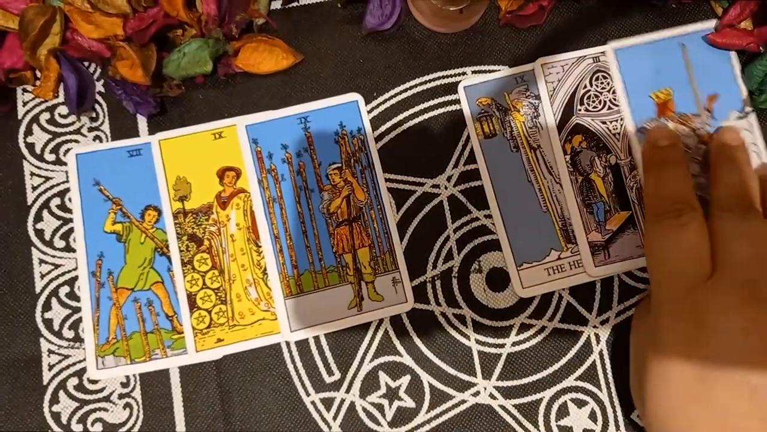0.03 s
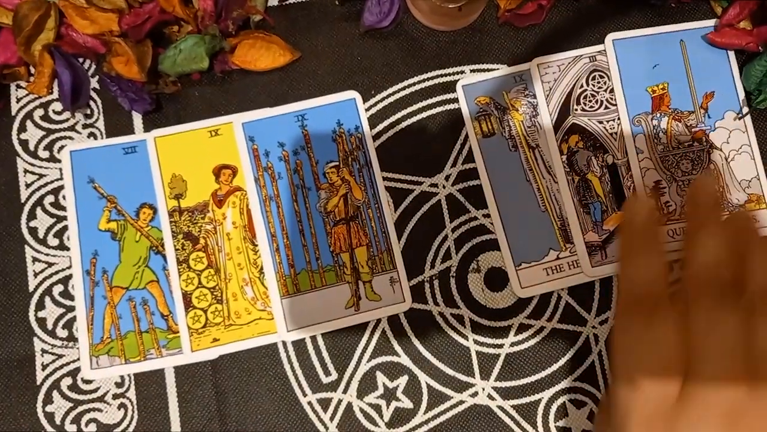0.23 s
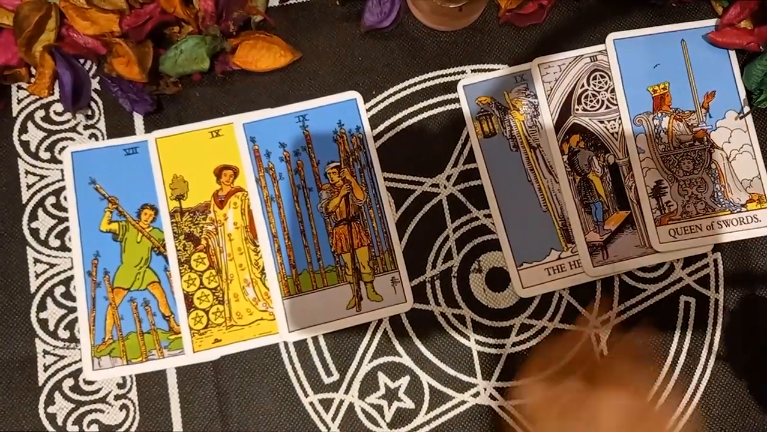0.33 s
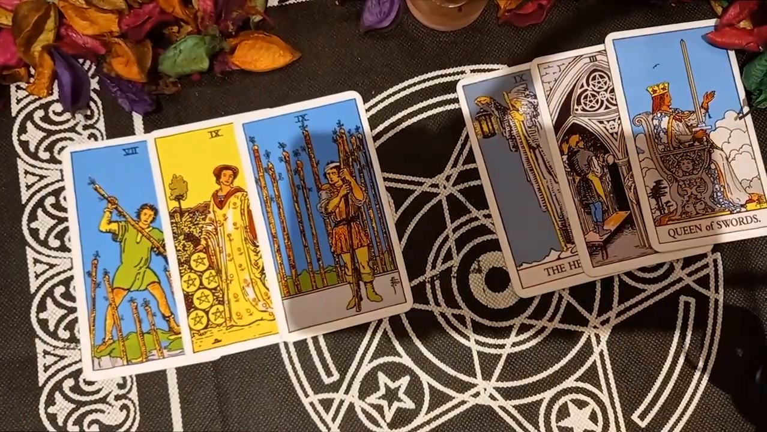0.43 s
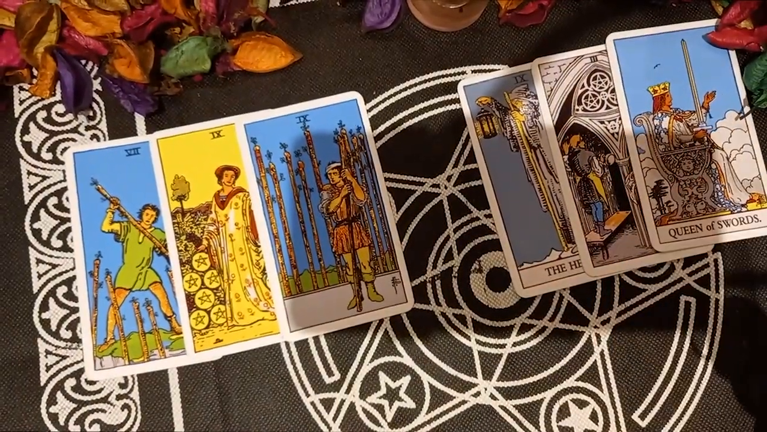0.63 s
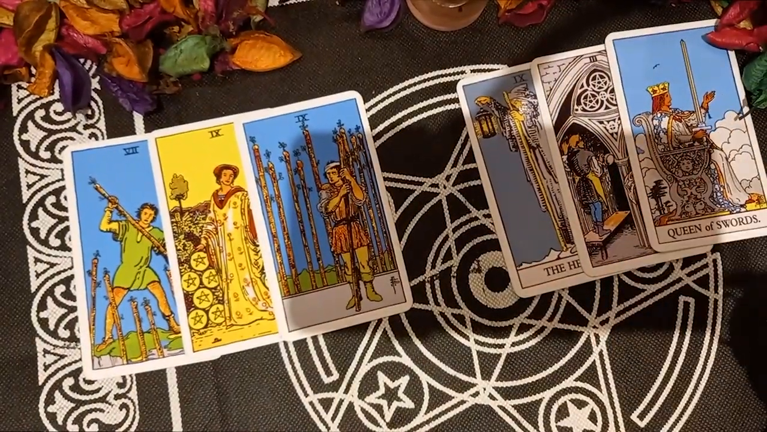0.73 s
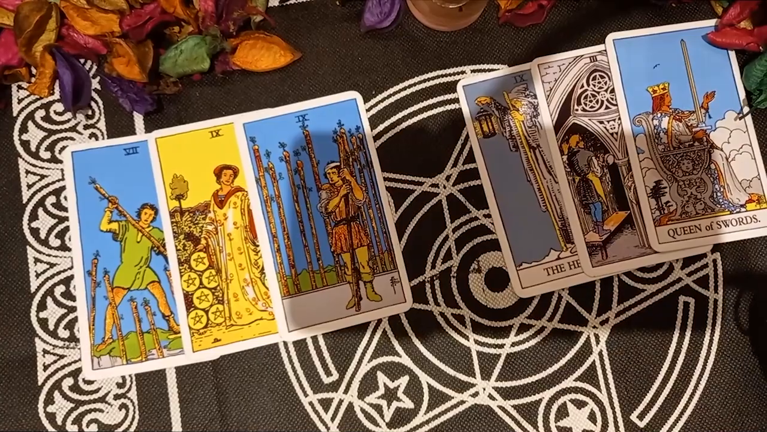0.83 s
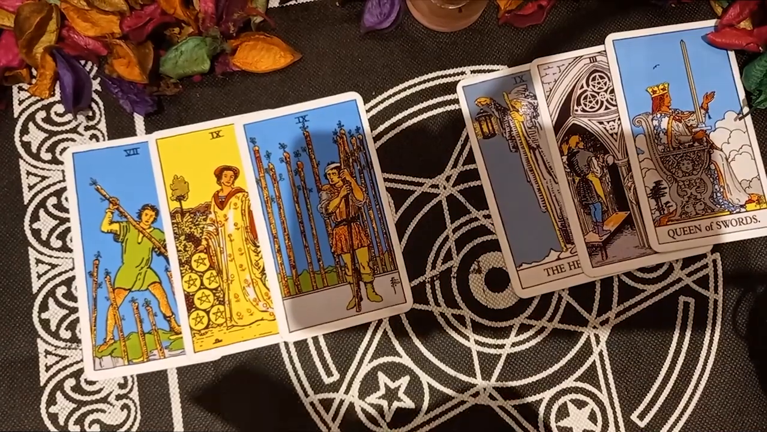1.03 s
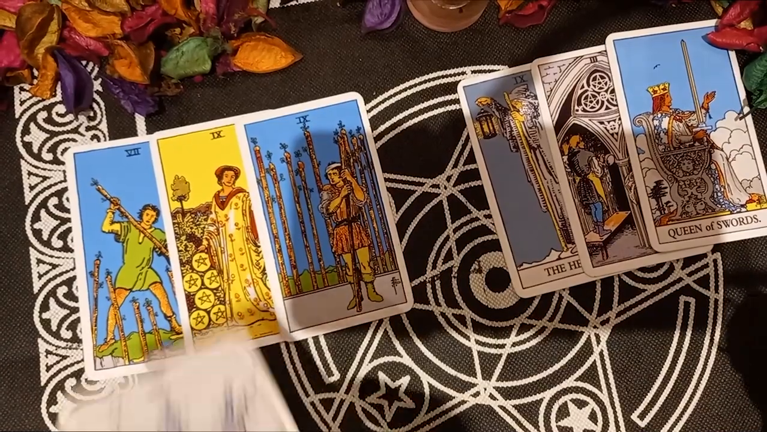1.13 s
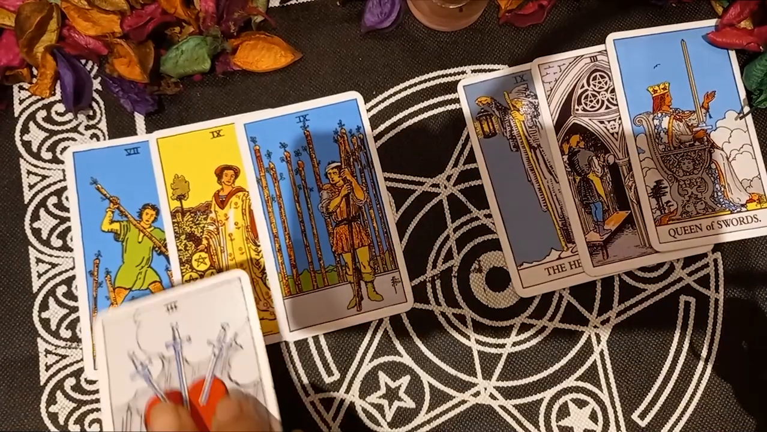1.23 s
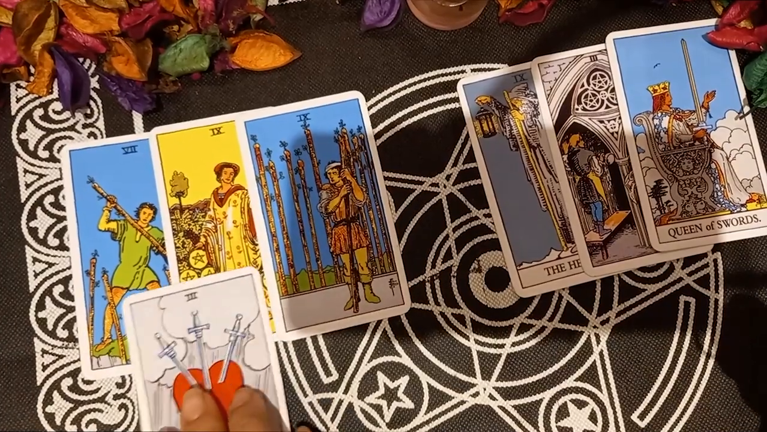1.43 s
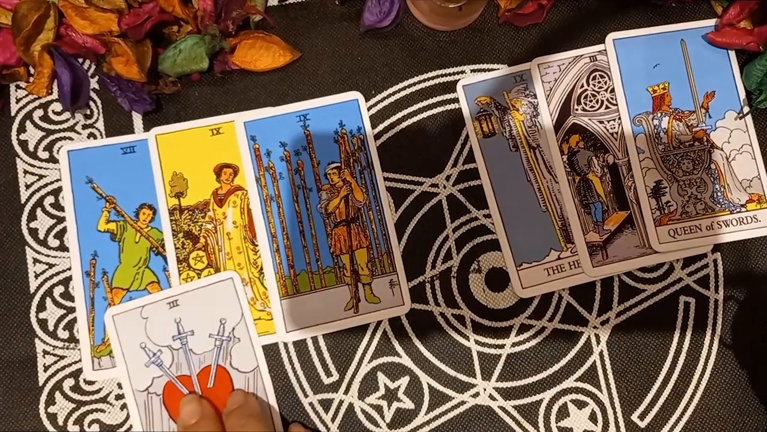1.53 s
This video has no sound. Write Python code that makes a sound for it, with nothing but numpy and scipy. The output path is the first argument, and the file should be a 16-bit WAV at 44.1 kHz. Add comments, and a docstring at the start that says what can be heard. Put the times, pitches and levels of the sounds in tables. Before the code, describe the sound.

A stiff card snaps once as it is drawn off a deck, close up in a small room. At first an arm rustles faintly over a tablecloth. From about 0.7 seconds fingers tick and the card slides with a rising hiss, then snaps sharply at 0.9 seconds with a short room echo. Light ticks follow around 1.1 and 1.4 seconds. Low rumble and faint hiss continue throughout.

```python
"""A stiff card drawn off a deck on a cloth-covered table in a small room, close to the microphone.
An arm rustles over the cloth, fingers brush and tick on the cards, and the edge slides with a rising hiss.
At 0.9 s the card lets go in a quick run of cracks, pushes puffs of air and slaps back on the deck.
The room answers and a few last ticks follow. A low rumble and faint hiss lie under it all."""
import sys
import numpy as np
from scipy import signal
from scipy.fft import rfft, irfft
from scipy.io import wavfile
from scipy.ndimage import uniform_filter1d

SR = 44100
rng = np.random.default_rng(int(sys.argv[2]) if len(sys.argv) > 2 else 0)


def persist_wave(psi):
    """Save psi, clipped to +-1, as 16-bit WAV."""
    counts = np.round(np.clip(psi, -1, 1) * 32767).astype(np.int16)
    wavfile.write(sys.argv[1], SR, np.atleast_2d(counts).T)


N = 70560

# cracks of the card's edge: start_s, level_db, treble_tilt_db_per_octave
EDGE_CRACKS = [(0.8973, -28.5, -11), (0.9026, -20.5, -5.5), (0.9043, -26, -1), (0.9054, -10, 0.5),
               (0.9063, -11, 0), (0.9098, -22.5, 5), (0.9107, -9.5, 1)]
SLAP_S = .9116  # the freed card lands back on the deck


def snap():
    """Each crack is a sharp click and a trace of scraping; the last slap sets card and deck ringing."""
    # colour of a crack: freq_hz, gain_db
    crack_colour = [(100, -29), (400, -17), (750, -4), (1050, 0), (1600, -13), (2100, -3), (2500, 6.5),
                    (2950, 5.5), (3400, -3.5), (3900, -3), (4400, -5), (5700, 0.5), (8000, -7.5),
                    (9800, -1.5), (12000, -17.5), (16000, -13.5)]
    # modes of card and deck: pitch_hz, level_db, t60_s
    card_modes = [(166, -40.5, .09), (387, -33, 0.045), (625, -36, 0.057), (773, -42.5, 0.086),
                  (1042, -35, 0.063), (1764, -51.5, 0.068), (2070, -49.5, 0.073), (2412, -44.5, 0.12),
                  (2574, -47, .06), (2690, -43, 0.062), (2927, -42.5, 0.086), (3200, -49, 0.045)]
    out, t = np.zeros(N), np.arange(SR // 4) / SR
    for start_s, level_db, tilt_db in EDGE_CRACKS:
        crack = -amp(level_db) * bent(click(crack_colour, tilt_db))
        fibre_scrape = amp(-6) * signal.fftconvolve(crack, burst(decay_s=.0008))
        add(out, start_s, crack)
        add(out, start_s, fibre_scrape)
    add(out, SLAP_S, ringing(card_modes, t))
    return out


def bent(x):
    """A stiff sheet carries high notes faster than low ones, smearing a click into a tiny chirp."""
    delay_s = 0.000677  # bending waves reach the card's edge this late at 1 kHz
    hz = np.fft.rfftfreq(2 * len(x), 1 / SR)
    phase_lag = 4 * np.pi * delay_s * np.sqrt(1000 * hz)
    return irfft(rfft(x, 2 * len(x)) * np.exp(-1j * phase_lag))


def puffs():
    """The flapping card pushes air: a short pressure peak inside a wider suction."""
    # puffs of air: peak_s, peak_db, half_width_s, suction_ratio
    air_puffs = [(0.9007, -40, .0006, .5), (0.9070, -23, 0.00042, 0.75), (0.9120, -25, 0.00039, 0.58)]
    spread = 2.9  # the suction lasts this many times as long as the push
    out = np.zeros(N)
    for peak_s, peak_db, half_width_s, suction in air_puffs:
        u = (np.arange(N) / SR - peak_s) / half_width_s
        push = (1 + suction) * np.exp(-u ** 2)
        pull = suction * np.exp(-(u / spread) ** 2)
        out += amp(peak_db) * (push - pull)
    return out


def sliding():
    """Card rubs on card: a light touch only fizzes, pressure makes the whole sheet sound."""
    # strokes of skin and card over card: peak_s, level_db, rise_s, fall_s, body_trim_db
    strokes = [(0.137, -64.5, .025, 0.013, 1), (0.748, -59.5, 0.0047, 0.0044, -5),
               (0.762, -66.5, 0.0039, 0.0062, 9.5), (0.810, -64, 0.039, 0.025, -7),
               (0.842, -59, 0.011, 0.0054, -4), (0.88, -52.5, 0.024, 0.034, 2),
               (1.095, -67, 0.024, 0.05, -1.5), (1.190, -69.5, 0.042, 0.043, -7)]
    # fizz of a light touch: freq_hz, gain_db
    fizz_colour = [(200, -27), (3000, -30), (4500, -16.5), (6500, 0.5), (9500, 1), (11000, -2.5),
                   (12500, -7), (16000, -11)]
    # body added by pressure: freq_hz, gain_db
    body_colour = [(200, -10), (800, -0.5), (1300, -7.5), (1800, -7.5), (2800, 0), (3800, -8), (5000, -16),
                   (16000, -30)]
    body_db = -10  # against the fizz, before each stroke's trim
    fizz_level = swells([row[:4] for row in strokes])
    body_level = swells([(s, db + body_db + trim, rise, fall) for s, db, rise, fall, trim in strokes])
    fizz = fizz_level * evened(coloured(friction(), fizz_colour))
    body = body_level * evened(coloured(friction(), body_colour))
    return fizz + body


def friction():
    """Fine grains in a smooth hiss, uneven as the card sticks and slips."""
    grains_per_s, stick_db, stick_s = 2500, 2, .012
    grains = rng.standard_normal(N) * (rng.random(N) < grains_per_s / SR)
    grip = evened(uniform_filter1d(rng.standard_normal(N), size=round(stick_s * SR)))
    return amp(stick_db * grip) * .5 * (evened(grains) + rng.standard_normal(N))


def ticks():
    """Small catches of a card edge: a brief scrape, and perhaps a high ring."""
    # catches of fingers and card edges: start_s, level_db, ring_over_scrape_db, scrape_decay_s
    catches = [(0.6876, -49, 18, 0.0029), (0.74, -51, -9, .005), (0.7599, -50, -6, 0.0017),
               (1.003, -45, -16, 0.0025), (1.0780, -33.5, -21, 0.0039), (1.0872, -32, -6, 0.0038),
               (1.379, -47, -16, .003)]
    # colour of a tick: freq_hz, gain_db
    tick_colour = [(200, -15), (700, -3), (1400, 4), (1900, -11.5), (2700, -9), (4500, -1), (7000, 0.5),
                   (10000, -3.5), (16000, -16)]
    # modes of a card's corner: pitch_hz, relative_db, t60_s
    corner_modes = [(2520, -14, 0.013), (6800, -5, 0.01), (7080, 6, 0.008)]
    ring = ringing(corner_modes, np.arange(SR // 20) / SR)
    out = np.zeros(N)
    for start_s, level_db, ring_db, decay_s in catches:
        add(out, start_s, amp(level_db) * signal.fftconvolve(click(tick_colour), burst(decay_s)))
        add(out, start_s, amp(level_db + ring_db) * ring / np.linalg.norm(ring))
    return out


def cloth():
    """Dull rustle of the arm moving over the tablecloth."""
    # arm movements: peak_s, level_db, rise_s, fall_s
    sweeps = [(0.06, -65.5, 0.12, 0.068), (0.33, -71, 0.15, 0.085), (0.79, -71, 0.066, 0.18),
              (1.10, -60.5, 0.023, 0.028), (1.25, -69, 0.22, 0.29), (1.56, -71.5, 0.19, .1)]
    # colour of the rustle: freq_hz, gain_db
    rustle_colour = [(60, -4), (200, -3.5), (420, -2), (800, 0.5), (1300, -15.5), (2500, -19),
                     (6000, -16.5), (16000, -53)]
    return swells(sweeps) * noise(rustle_colour)


def echoes(x):
    """Table and nearby things throw the sound straight back at the microphone."""
    # near surfaces: delay_s, gain_db
    reflections = [(.0064, -21), (0.012, -20.5)]
    out = np.zeros(N)
    for delay_s, gain_db in reflections:
        add(out, delay_s, amp(gain_db) * x)
    return out


def room(handling):
    """Every crack gets its own tail, the quiet handling shares one; a few low resonances hang on."""
    # resonances that outlast the snap: pitch_hz, level_db, t60_s
    room_modes = [(391, -43.5, 0.32), (415, -47, 0.44), (641, -54, 0.21)]
    delay_s, build_s, snap_send_db = .006, .025, 0.5
    out, t = np.zeros(N), np.arange(SR) / SR
    add(out, delay_s, signal.fftconvolve(handling, room_tail()))
    for start_s, level_db, _ in EDGE_CRACKS:
        add(out, start_s + delay_s, amp(level_db + snap_send_db) * room_tail())
    add(out, SLAP_S + delay_s, ringing(room_modes, t) * (1 - np.exp(-t / build_s)))
    return out


def room_tail(level_db=-8, rise_s=0.0039):
    """One diffuse decay of the room: it builds quickly, and the low mids last longest."""
    # decay of the room: freq_hz, t60_s
    decay_times = [(150, 0.23), (500, 0.86), (1400, 0.35), (3500, 0.35), (9000, 0.39), (16000, 0.3)]
    # colour of the room: freq_hz, gain_db
    room_colour = [(100, 0), (280, 4), (400, 19.5), (520, 2.5), (1000, 7.5), (1600, 0.5), (2600, 3),
                   (4000, -1.5), (6000, -5), (9500, -9), (12000, -17.5), (16000, -16)]
    hz, t, spectra = signal.stft(rng.standard_normal(SR), SR, nperseg=256)
    decay = amp(read(room_colour, hz)[:, None] - 60 * t / read(decay_times, hz)[:, None])
    tail = signal.istft(spectra * decay * (1 - np.exp(-t / rise_s)), SR)[1]
    return amp(level_db) * tail / np.linalg.norm(tail)


def room_tone(rumble_db=-47, hiss_db=-58):
    """The air of the room: a wavering low rumble under steady hiss."""
    # colour of the rumble: freq_hz, gain_db
    rumble_colour = [(15, -58.5), (31, -29), (41, 0.5), (52, -1.5), (65, 0.5), (85, -9.5), (115, -16.5),
                     (150, -29.5), (300, -75)]
    # wavering of the rumble: time_s, relative_db
    rumble_swell = [(0.0, -48), (0.066, -51.5), (0.102, -53), (0.31, -43), (0.552, -54.5), (0.566, -46),
                    (0.77, -46.5), (0.792, -50), (1.114, -41), (1.144, -52.5), (1.212, -41.5),
                    (1.386, -50.5), (1.568, -49), (1.6, -55)]
    # colour of the hiss: freq_hz, gain_db
    hiss_colour = [(40, -8), (110, 0.5), (180, 4.5), (260, -4), (400, -8), (700, -21.5), (1200, -32),
                   (3000, -39.5), (4500, -37), (6500, -29), (10500, -30.5), (12500, -37.5), (16000, -40)]
    low = noise(rumble_colour)
    low /= np.sqrt(uniform_filter1d(low ** 2, size=3000) + 1e-6)  # flatten its chance swells
    time_s, relative_db = np.transpose(rumble_swell)
    rumble = evened(low * amp(np.interp(np.arange(N) / SR, time_s, relative_db)))
    return amp(rumble_db) * rumble + amp(hiss_db) * noise(hiss_colour)


def click(colour, tilt_db=0, size=2048):
    """The sharpest causal click of this colour, of energy 1, tilted per octave above 2500 Hz."""
    hz = abs(np.fft.fftfreq(size, 1 / SR))
    treble_octaves = np.log2(np.maximum(hz / 2500, 1))
    log_gain = np.log(amp(read(colour, hz) + tilt_db * treble_octaves))
    y = np.fft.ifft(np.exp(np.conj(signal.hilbert(log_gain)))).real  # minimum phase
    return y / np.linalg.norm(y)


def burst(decay_s, size=1024):
    """A dying burst of noise, of energy 1."""
    y = rng.standard_normal(size) * np.exp(-np.arange(size) / SR / decay_s)
    return y / np.linalg.norm(y)


def ringing(modes, t):
    """Dying sines, struck together."""
    return sum(amp(db - 60 * t / t60) * np.sin(2 * np.pi * hz * t) for hz, db, t60 in modes)


def swells(moves):
    """Level of overlapping movements that each grow and die away."""
    t = np.arange(N) / SR
    levels = [amp(db) * np.exp(np.minimum((t - s) / rise, (s - t) / fall)) for s, db, rise, fall in moves]
    return np.sqrt(sum(level ** 2 for level in levels))


def noise(colour):
    """Steady noise of this colour, at RMS 1."""
    return evened(coloured(rng.standard_normal(N), colour))


def coloured(x, colour):
    """Filters a sound by a curve of freq_hz, gain_db."""
    return irfft(rfft(x) * amp(read(colour, np.fft.rfftfreq(len(x), 1 / SR))), len(x))


def read(curve, hz):
    """A curve's value at hz, on a log frequency axis."""
    freq_hz, value = np.transpose(curve)
    return np.interp(np.log(hz + 1), np.log(freq_hz + 1), value)


def amp(db):
    """Decibels to amplitude."""
    return 10 ** (np.asarray(db) / 20)


def evened(x):
    """Scales to RMS 1."""
    return x / np.sqrt(np.mean(x ** 2) + 1e-20)


def add(mix, start_s, sound):
    """Mixes a sound in from start_s."""
    part = mix[round(start_s * SR):][:len(sound)]
    part += sound[:len(part)]


def scene():
    """Everything is nearly central at the microphone; the low mids spread a little and lean left."""
    # stereo width: freq_hz, side_over_mid_db
    width = [(30, -48), (70, -38), (150, -18), (350, -21), (800, -26), (1400, -32), (2500, -46),
             (6000, -40), (16000, -36)]
    # stereo balance: freq_hz, left_over_right_db
    lean = [(30, 0), (90, 0), (160, 1.9), (350, 1.1), (700, .6), (2000, 0), (16000, 0)]
    handling = ticks() + sliding()
    cards = snap() + puffs() + handling
    mid = cards + echoes(cards) + room(handling) + cloth() + room_tone()
    side = coloured(signal.hilbert(mid).imag, width)
    left = coloured(mid + side, [(hz, db / 2) for hz, db in lean])
    right = coloured(mid - side, [(hz, -db / 2) for hz, db in lean])
    return np.array([left, right])


def record(dry):
    """Each microphone channel adds a trace of its own hiss; then the top of the treble is cut."""
    # colour of the self-noise: freq_hz, gain_db
    self_noise_colour = [(20, 12), (2500, -17.5), (4500, -5), (6500, 3), (10500, 4), (12500, 0),
                         (16000, -14)]
    self_noise_db, cutoff_hz = -85, 16200
    self_noise = amp(self_noise_db) * np.array([noise(self_noise_colour) for _ in dry])
    low_pass = signal.firwin(511, cutoff_hz, window=("kaiser", 9), fs=SR)
    return signal.oaconvolve(dry + self_noise, low_pass[None], "same")


dry = scene()
out = record(dry)
persist_wave(out)
```